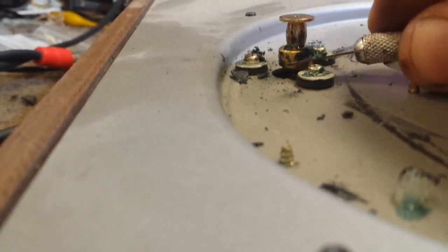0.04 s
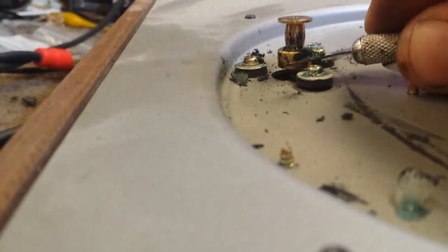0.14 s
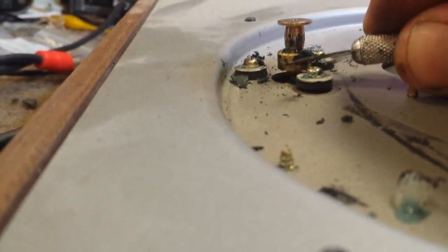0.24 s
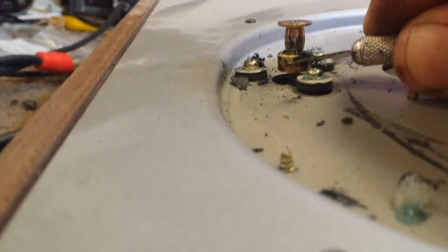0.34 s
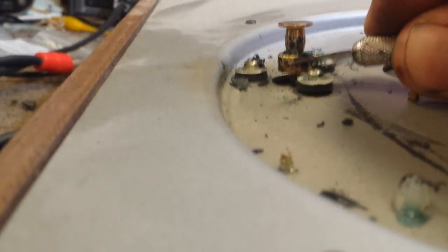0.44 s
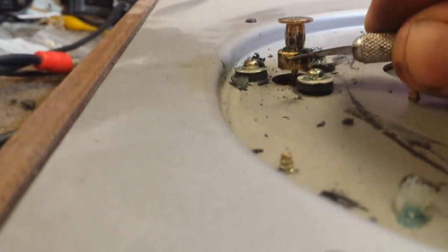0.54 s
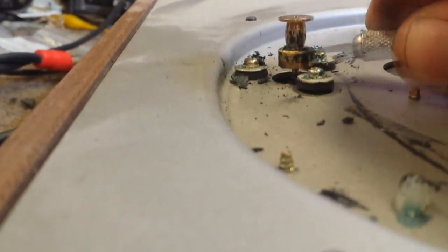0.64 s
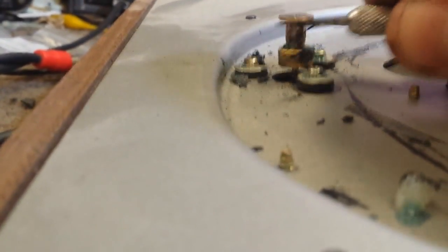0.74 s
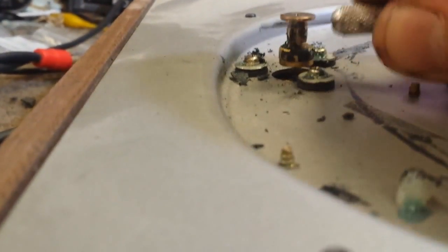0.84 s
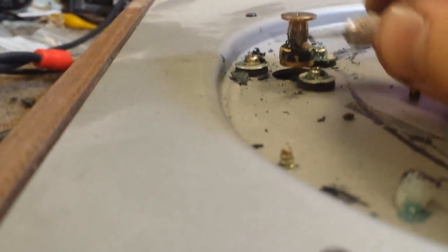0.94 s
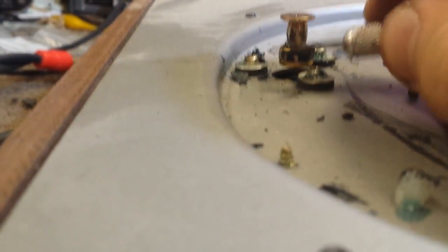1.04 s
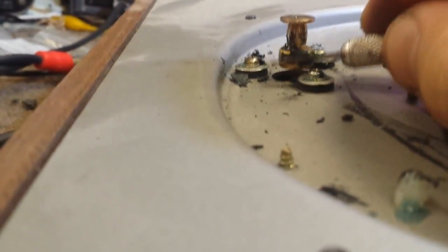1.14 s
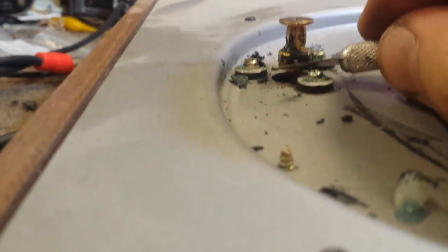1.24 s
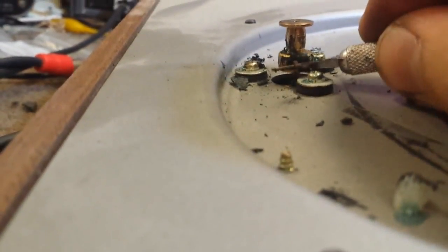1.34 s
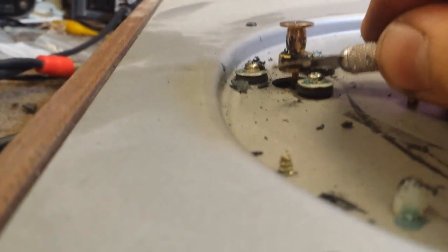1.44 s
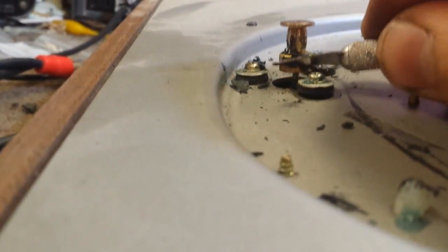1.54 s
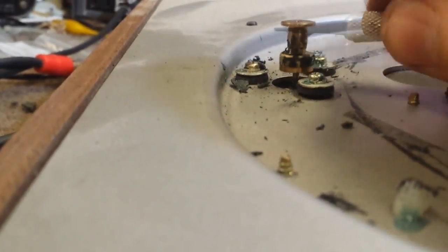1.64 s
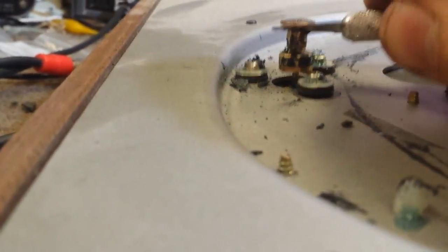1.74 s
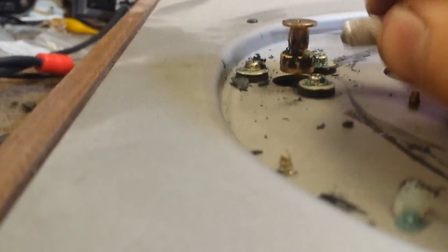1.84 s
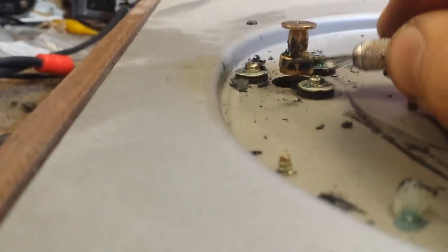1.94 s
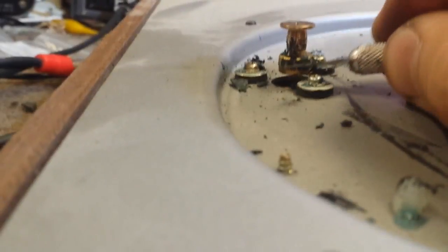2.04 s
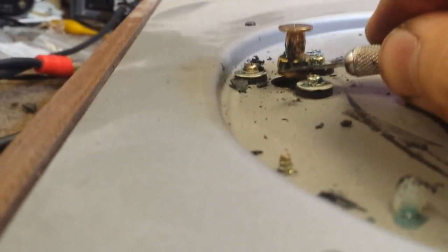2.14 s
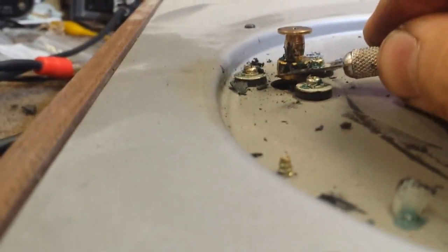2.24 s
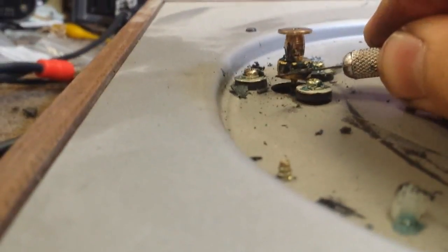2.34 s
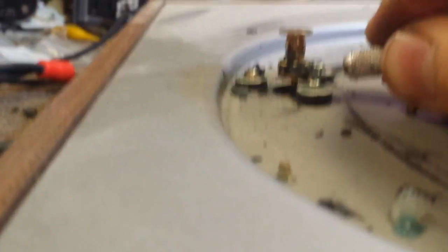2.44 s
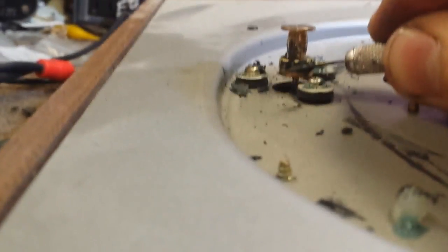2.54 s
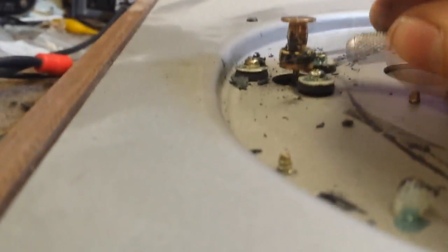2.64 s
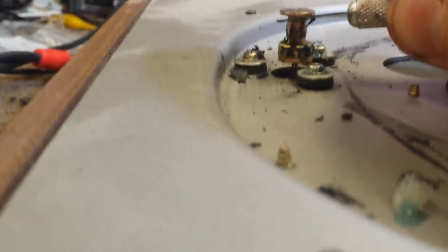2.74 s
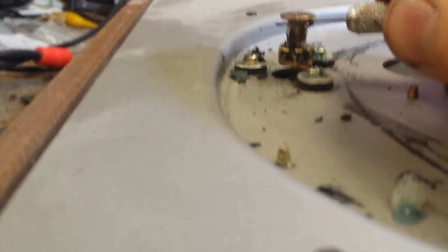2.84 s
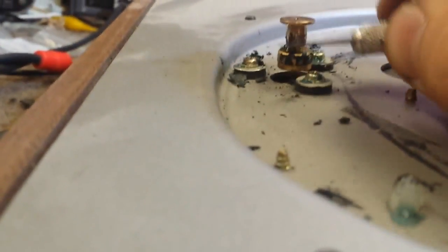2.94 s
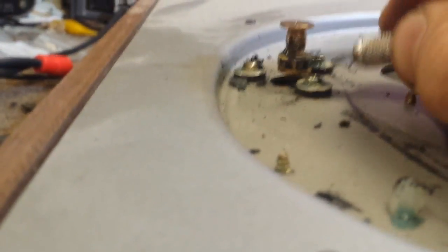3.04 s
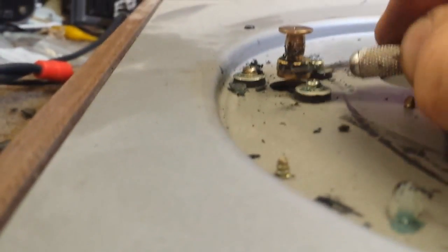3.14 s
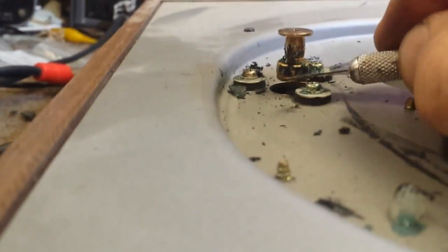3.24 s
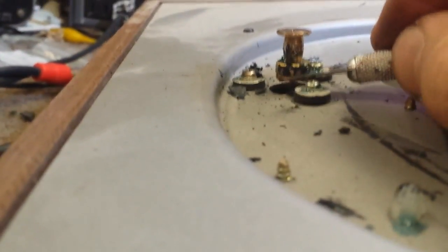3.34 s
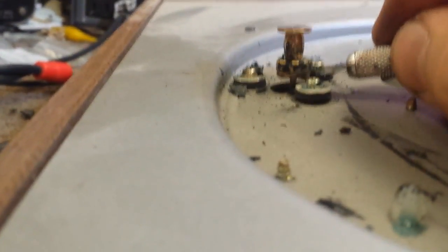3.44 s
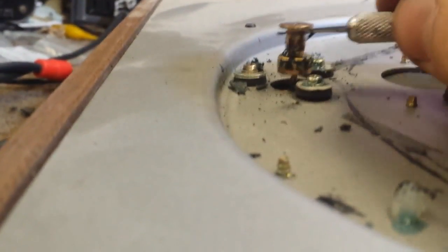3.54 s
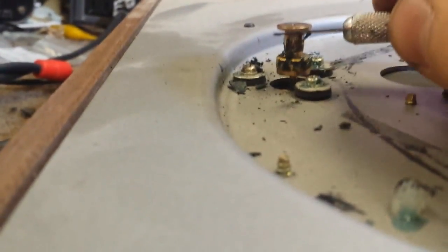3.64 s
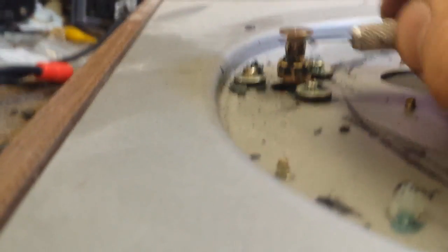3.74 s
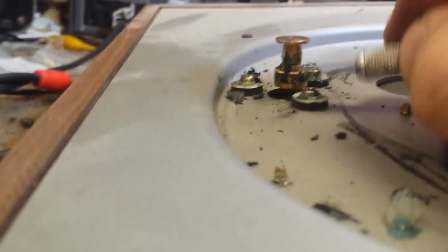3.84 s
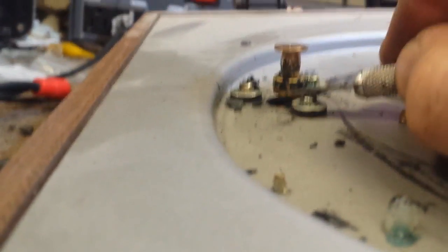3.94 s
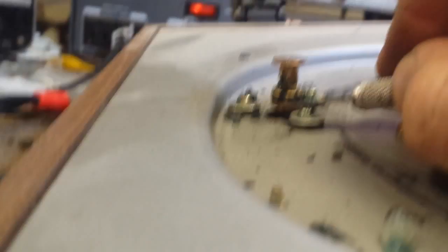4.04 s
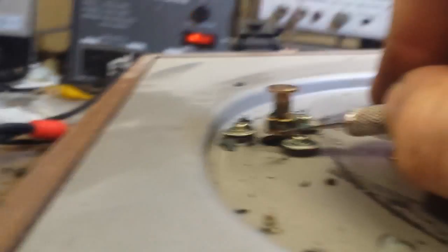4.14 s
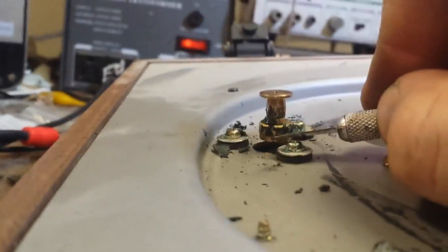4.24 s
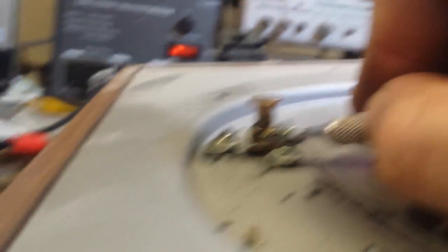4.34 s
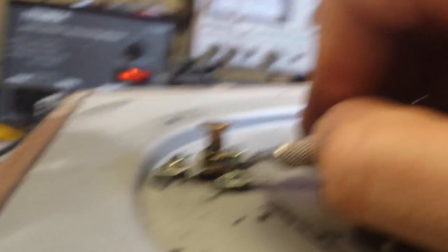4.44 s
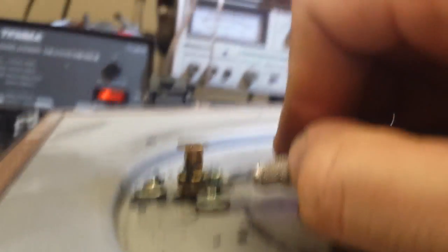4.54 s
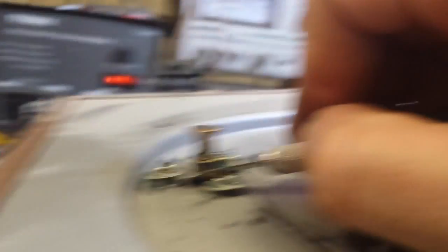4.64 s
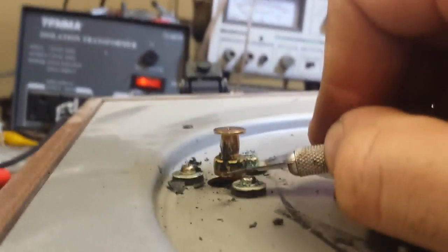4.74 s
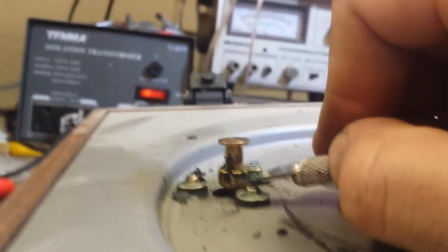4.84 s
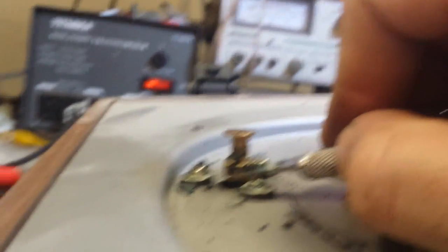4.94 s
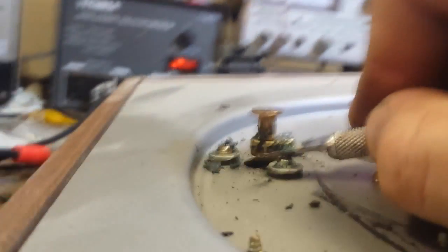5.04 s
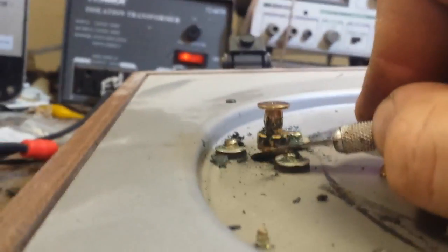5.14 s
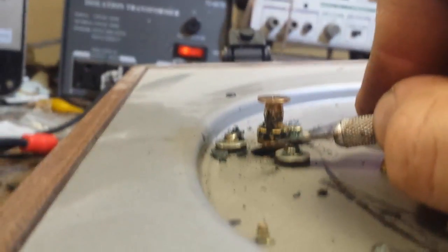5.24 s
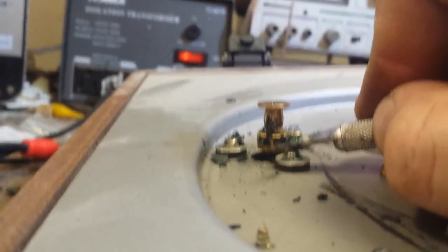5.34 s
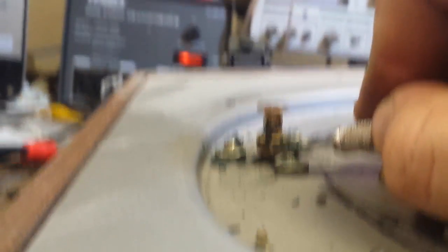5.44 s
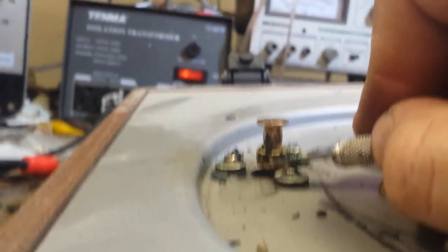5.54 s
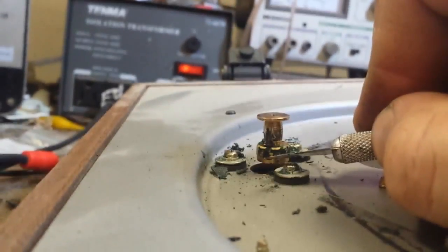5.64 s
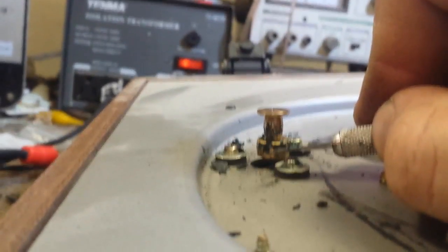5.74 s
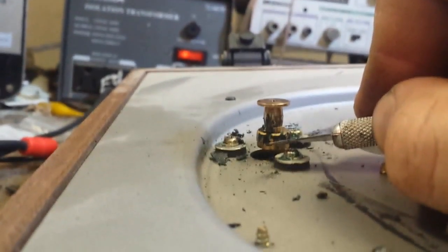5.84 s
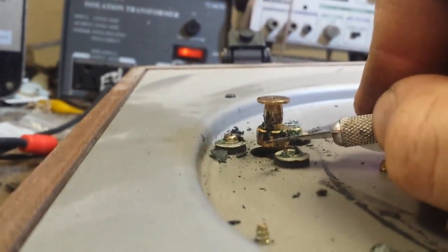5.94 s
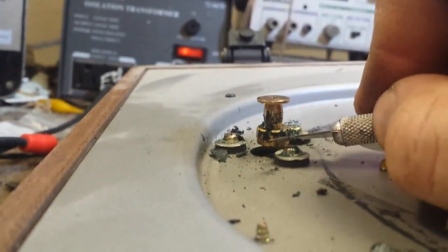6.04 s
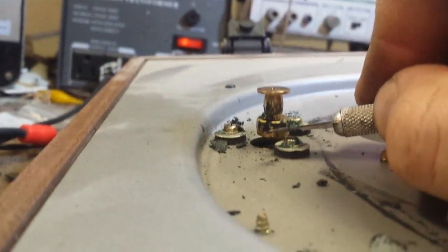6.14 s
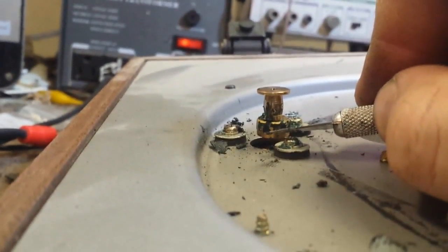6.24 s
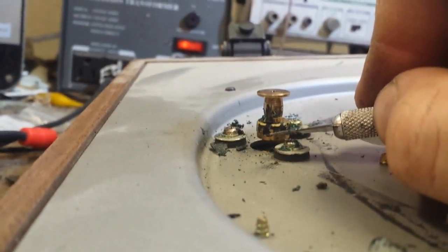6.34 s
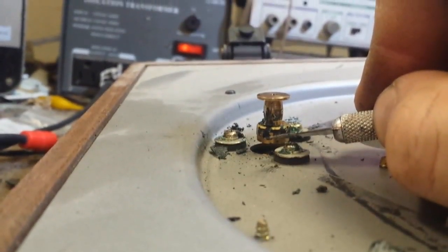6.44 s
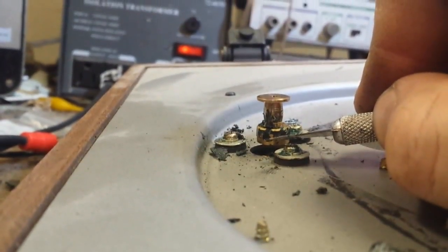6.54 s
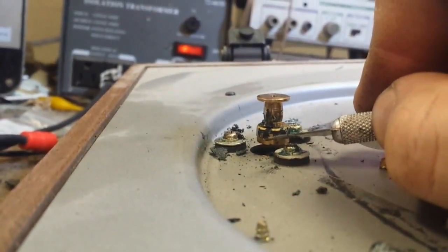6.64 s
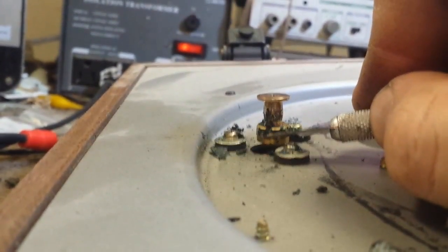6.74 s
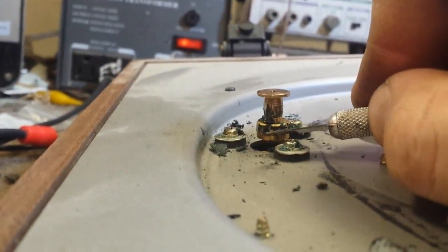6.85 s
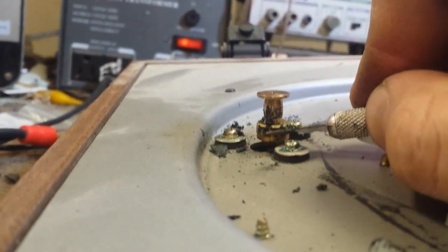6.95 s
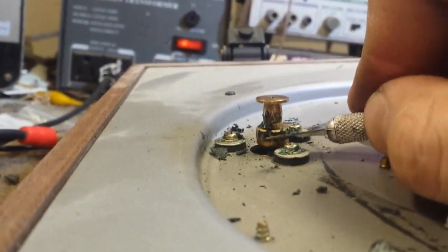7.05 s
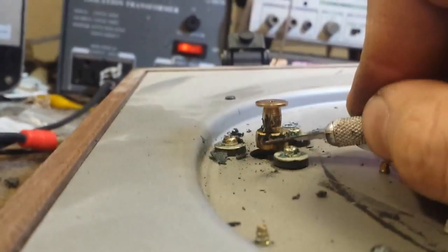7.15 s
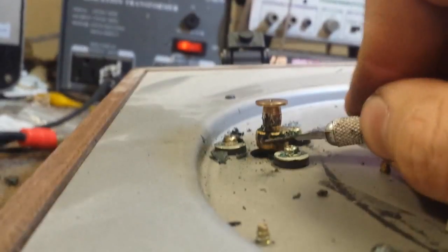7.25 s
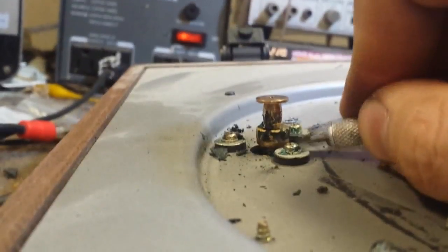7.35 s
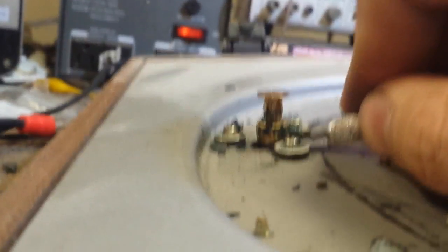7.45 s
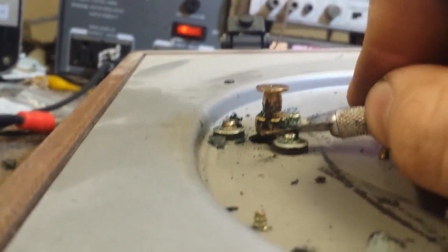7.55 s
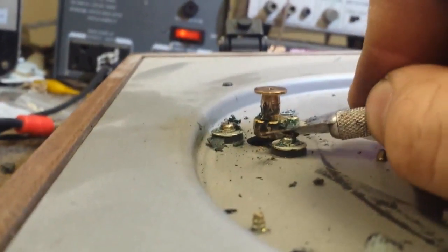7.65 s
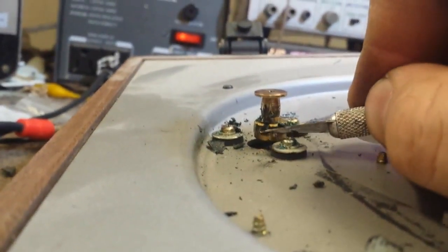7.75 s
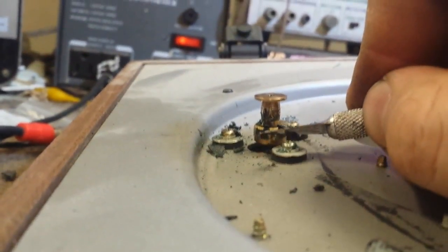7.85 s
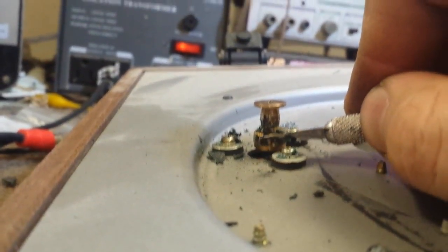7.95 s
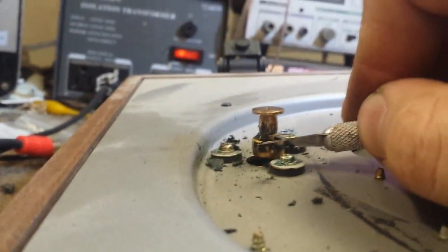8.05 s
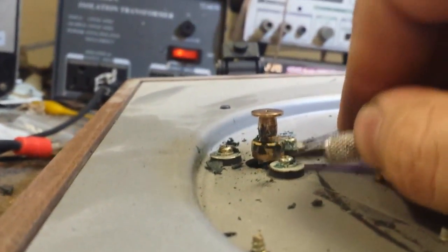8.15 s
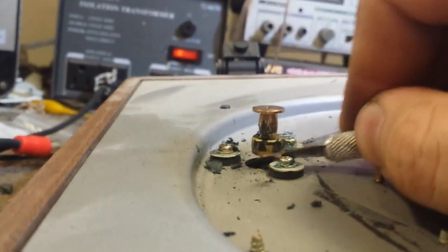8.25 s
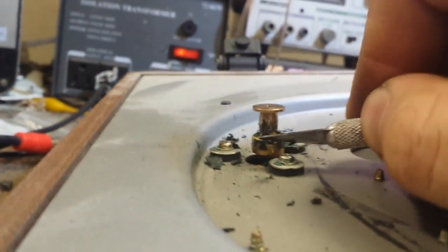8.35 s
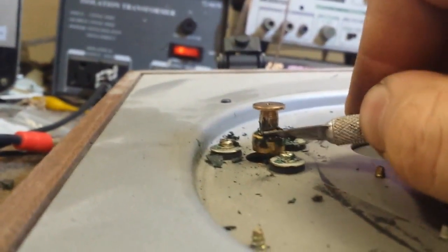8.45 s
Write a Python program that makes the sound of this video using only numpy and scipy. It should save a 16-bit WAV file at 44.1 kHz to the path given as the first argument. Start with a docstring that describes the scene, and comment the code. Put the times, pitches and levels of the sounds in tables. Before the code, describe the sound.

A quiet workshop, heard very close in stereo, with soft hiss, low mains hum and a thin high whine toward the right that shifts between two pitches. From 0 s a small blade rasps hard residue on a brass motor pulley in short gritty strokes, with a tick near 0.2 s. Sharp slips crack, ring and knock the loosely mounted motor at about 0.5, 0.65 and 0.95 s, a tight cluster at 1.6-1.75, then 2.3, a strong one at 2.65, and 3.5 s. Around 3.7-4.4 s a hand brushes the camera; soft thumps and shell ticks follow at 4.55, strongest at 4.65, then 5.05 and 5.4, with a small tap at 5.5. Mostly background remains until about 7 s. Scraping returns, with a rapid four-click judder and sharp hit at 7.3-7.35, crackling flakes, light touches, a double click near 8.1 and a final coarse scrape at 8.25-8.35 s.

```python
"""A hobby knife picks and scrapes hardened residue off the brass pulley of a turntable motor.
Each slip of the blade cracks the residue, rings the steel and knocks the motor, which shudders on its
rubber mounts; cracks, rings and shudders are noise and fracture trains sent through resonances.
A hand brushes and bumps the camera held close by: coloured friction noise, soft thumps and shell ticks.
Under it all lie mains hum (sines), hiss (coloured noise) and a thin electronic whine (narrow noise)."""
import sys
import numpy as np
from scipy import signal
from scipy.fft import rfft, irfft, next_fast_len
from scipy.io import wavfile
from scipy.ndimage import map_coordinates

SR = 44100
rng = np.random.default_rng(int(sys.argv[2]) if len(sys.argv) > 2 else 0)


def store_pcm(level_fs):
    """Save levels as 16-bit WAV."""
    pcm = np.round(np.clip(level_fs, -1, 1) * 32767).astype(np.int16)
    wavfile.write(sys.argv[1], SR, np.atleast_2d(pcm).T)


N = 374001
SPAN = 16384  # samples in one short sound, and the room left for a filter to ring out


def amp(db):
    """Decibels to gain."""
    return 10 ** (np.asarray(db) / 20)


def unit(x):
    """Scale to rms 1."""
    return x / np.sqrt(np.mean(x ** 2) + 1e-20)


def burst(x):
    """Scale each channel to the energy of 10 ms at rms 1."""
    energy = np.sum(x ** 2, axis=-1, keepdims=True)
    return x * np.sqrt(SR / 10 ** 2 / (energy + 1e-20))


def pan(left_db):
    """Left and right gains of mean power 1, with the left louder by left_db."""
    return unit(amp([[left_db / 2], [-left_db / 2]]))


def wobble(rate):
    """A smooth random curve through rate random points a second."""
    knots = rng.standard_normal(int(N * rate / SR) + 4)
    return map_coordinates(knots, [np.arange(N) * rate / SR])


def filtered(x, response):
    """Multiply the spectrum of x by a response of frequency."""
    n = x.shape[-1]
    padded = next_fast_len(n + SPAN)
    spectrum = rfft(x, padded) * response(np.fft.rfftfreq(padded, 1 / SR))
    return irfft(spectrum, padded)[..., :n]


def coloured(x, points):
    """Shape x by a smooth spectrum drawn through (frequency [Hz], level [dB]) points."""
    f, db = np.transpose(points)
    return filtered(x, lambda hz: amp(np.interp(np.log(hz + 1), np.log(f), db)))


def ringing(x, modes):
    """Send x through damped resonances: (frequency [Hz], width [Hz], level [dB])."""
    def response(f):
        total = 0
        for k, (centre, width, db) in enumerate(modes):
            resonance = 1j * f * width / (centre * centre - f * f + 1j * f * width)
            total = total + (-1) ** k * amp(db) * resonance  # neighbours have opposite signs
        return total
    return filtered(x, response)


def ports(size, alike):
    """Noise at the left and right microphones; alike is their correlation."""
    a, b = rng.standard_normal((2, size))
    turn = np.arccos(np.clip(alike, -1, 1)) / 2
    shared, opposed = np.cos(turn) * a, np.sin(turn) * b
    return np.array([shared + opposed, shared - opposed])


def lagged(x, seconds):
    """Make x reach the right microphone later than the left by this time."""
    sides = np.array([[1], [-1]])
    return filtered(x, lambda hz: np.exp(1j * np.pi * hz * seconds * sides))


def add(track, s, sound):
    """Mix a sound in at time s."""
    i = max(0, round(s * SR))
    track[:, i:i + SPAN] += sound[:, :max(0, N - i)]


def contact(seconds, alike, snap=0.97):
    """The force of one contact: a sharp break and a fading train of tiny fractures."""
    t = np.arange(SPAN) / SR
    uneven = amp(5 * rng.standard_normal(SPAN))
    fractures = burst(ports(SPAN, alike) * np.exp(-t / seconds) * uneven)
    # the longer the contact grinds, the less of its force goes into the sharp break
    first = burst(signal.unit_impulse(SPAN, round(SR * .0004)))
    return fractures + snap * np.exp(-seconds / 0.0036) * first


def bounce(hz, rise, fall, stiffer):
    """A few cycles of a soft mount: stiffer while compressed, so the pitch drops to hz as it relaxes."""
    t = np.arange(SPAN) / SR
    cycles = hz * t + stiffer * (1 - np.exp(-hz * t))
    return np.sin(2 * np.pi * cycles) * (1 - np.exp(-t / rise)) * np.exp(-t / fall)


def swell(start, length, shape, late=1):
    """One hand movement, from 0 up to 1 and back; late over 1 builds slowly and lets go quickly."""
    u = (np.arange(N) / SR - start) / length
    inside = (u > 0) & (u < 1)
    out = np.zeros(N)
    out[inside] = np.sin(np.pi * u[inside] ** late) ** shape
    return out


# spectrum of the room noise: (frequency [Hz], relative level [dB])
ROOM_SPECTRUM = [(20, -12), (55, -2.5), (90, 0.5), (250, -5), (400, -10.5), (800, -13), (1600, -17),
                 (3300, -17), (5500, -16.5), (9000, -20), (14500, -20.5)]


def room_hiss():
    """Steady noise, shaped to the dull spectrum of the room."""
    return amp(-67.0) * unit(coloured(ports(N, alike=0.22), ROOM_SPECTRUM))


# tones of the mains hum: (frequency [Hz], middle level [dB])
HUM_TONES = [(60, -72), (120, -85), (180, -83.5), (263, -84.5), (360, -85), (420, -94.5), (480, -85.5),
             (600, -85.5), (720, -88), (960, -94)]


def mains_hum():
    """Low sine tones whose levels each sway a little at random."""
    t = np.arange(N) / SR
    hum = 0
    for hz, db in HUM_TONES:
        level = amp(db + 2.1 * wobble(5.8)) * np.sqrt(2)
        hum = hum + level * np.sin(2 * np.pi * (hz * t + rng.random()))
    return hum


# spans in which the whine sits at its upper pitch: (start time [s], end time [s])
UPPER_WHINE_SPANS = [(-1, .63), (3.33, 6.4), (7.16, 8.46)]
# bands of the whine at its lower pitch: (frequency [Hz], width [Hz], relative level [dB])
LOW_WHINE_BANDS = [(4870, 120, -5), (5680, 120, 0), (6430, 130, -4), (7300, 200, -12)]
WHINE_SWITCH_S, WHINE_GLIDE_S = .03, .06  # crossfade time, time constant of the glide
WHINE_SAG_HZ = 485  # it glides up into the upper pitch and sags before leaving it


def electronic_whine():
    """Narrow bands of noise, mostly on the right, that change between two pitches."""
    t = np.arange(N) / SR
    depths = [np.minimum(t - start, end - t) for start, end in UPPER_WHINE_SPANS]
    inside_s = np.max(depths, axis=0).clip(0)  # time to the nearer end of the span, 0 outside
    upper = np.clip(inside_s / WHINE_SWITCH_S, 0, 1)
    sag_hz = WHINE_SAG_HZ * np.exp(-inside_s / WHINE_GLIDE_S)
    glide = np.exp(-2j * np.pi * np.cumsum(sag_hz) / SR)
    band = ringing(ports(N, alike=.2), [(5700, 1100, -17), (6507, 100, -1), (13936, 1600, -15.5)])
    # turning the phase of the analytic signal shifts the whole band down in pitch
    shifted = np.real(signal.hilbert(band, next_fast_len(N))[:, :N] * glide)
    high = amp(-65.5) * unit(shifted) * pan(-20.5)
    low = amp(-71.5) * unit(ringing(ports(N, alike=0.15), LOW_WHINE_BANDS)) * pan(-22.5)
    return upper * high + (1 - upper) * low


def background():
    """Room noise, mains hum and whine are independent and simply add up."""
    return room_hiss() + mains_hum() + electronic_whine()


# skin and cloth sliding by the camera: (start time [s], length [s], level [dB])
RUB_MOVES = [(3.687, .19, -55), (3.995, .07, -48.5), (4.04, .17, -37), (4.275, .092, -39), (4.32, .17, -54),
             (4.64, .063, -33), (4.755, 0.063, -53), (4.906, .1, -55.5), (5.093, 0.073, -46.5),
             (5.849, .3, -70.5)]
# colour of the rub at each microphone: (frequency [Hz], relative level [dB])
RUB_SPECTRUM_LEFT = [(40, -14), (160, 4), (350, 0), (1700, -3), (3300, 5), (4400, 4.5), (4900, 6),
                     (5400, 0), (9000, -1.5), (13500, -2.5)]
RUB_SPECTRUM_RIGHT = [(40, -18), (160, 9.5), (340, -4), (800, -2), (980, 1.5), (1170, 1), (1380, 3),
                      (2200, -12), (2900, -2.5), (3400, -10.5), (4900, -5), (5400, -2), (6400, 0.5),
                      (11000, -20.5)]
RUB_SHAPE = 1.74  # a rub swells and fades as a half sine to this power


def brushing():
    """Fine-grained friction on the camera body; each port colours it differently."""
    speed = sum(amp(db) * swell(start, length, RUB_SHAPE, late=1.25) for start, length, db in RUB_MOVES)
    drag = ports(N, alike=0.17) * amp(1.1 * wobble(400) + 0.6 * wobble(56))
    left = unit(coloured(drag[0], RUB_SPECTRUM_LEFT))
    right = unit(coloured(drag[1], RUB_SPECTRUM_RIGHT))
    rub = np.array([left, right]) * pan(-5)
    shell_modes = [(996, 130, -2.5), (1407, 53, 11.5), (1916, 140, -19), (3050, 160, -8.5)]
    shell = unit(ringing(drag, shell_modes)) * pan(-10)
    return speed * (rub + amp(-11.5) * shell)


# bumps on the camera: (time [s], thump level [dB], shell knock level [dB], shell tick level [dB],
# contact decay time [s], thump pitch [Hz], left-right difference of the knock [dB])
CAMERA_BUMPS = [(0.855, -52, -40, -48.5, .0003, 300, 23.5), (4.547, -33, -50, -68, .003, 116, -5.5),
                (4.653, -22, -37.5, -29, .015, 167, -9), (5.038, -28, -42.5, -40.5, 0.0074, 165.6, -13.5),
                (5.306, -60.5, -55.5, -67.5, 0.0012, 200, -19), (5.368, -34, -32, -33, 0.00215, 161, -20),
                (5.5004, -48.5, -48, -50, .0012, 122.5, -23), (8.079, -44, -78, -75, 0.0022, 131, -4)]
THUMP_DELAY_S = .0015  # the body of the camera follows the touch on its shell
RUSTLE_CONTACT_S = .015  # a bump that slides this long rustles as loudly as it ticks


def bumps():
    """A finger knocks the camera: a soft thump of a few cycles, a shell knock and tick, a brief tremble."""
    out, t = np.zeros((2, N)), np.arange(SPAN) / SR
    knock_modes = [(456, 410, 8), (865, 160, 11.4), (1195, 250, 14.7)]
    tick_modes = [(2500, 640, -9.5), (4740, 900, -2), (6030, 614, -1.0)]
    rustle_modes = [(7970, 1900, -2), (13300, 3000, -24)]
    for s, thump_db, knock_db, tick_db, seconds, hz, left_db in CAMERA_BUMPS:
        thump = amp(thump_db) * burst(bounce(hz, rise=0.0022, fall=0.0065, stiffer=0.11)) * pan(-10.5)
        knock = amp(knock_db) * burst(ringing(contact(seconds, alike=0.25), knock_modes)) * pan(left_db)
        tick = amp(tick_db) * burst(ringing(contact(seconds, alike=0.18), tick_modes)) * pan(left_db / 2)
        rustle_gain = amp(tick_db) * seconds / RUSTLE_CONTACT_S
        rustle = rustle_gain * burst(ringing(contact(seconds, alike=0.12), rustle_modes))
        fading = ports(SPAN, alike=0.27) * amp(-60 * t / 0.31)  # 60 dB down after 0.31 s
        tremble = amp(thump_db - 16) * burst(ringing(fading, [(209.7, 94, 0)]))
        add(out, s, knock + tick + rustle)
        add(out, s + THUMP_DELAY_S, thump + tremble)
    return lagged(out, seconds=-.00035)


# strokes of the edge over the residue:
# (start time [s], length [s], relative grit level [dB], relative motor grumble level [dB])
SCRAPE_STROKES = [(-.08, .22, -57, -54), (.125, .09, -49.5, -50), (0.176, .19, -56.5, -56.5),
                  (0.309, .12, -52.5, -56), (0.403, 0.25, -67, -55.5), (0.723, .31, -60.5, -60.5),
                  (0.801, 0.043, -66, -50.5), (1.244, 0.12, -56, -56.5), (1.334, .13, -60.5, -58.5),
                  (1.465, 0.12, -64, -66), (1.672, 0.264, -58, -63), (1.96, .13, -64.5, -64),
                  (2.102, 0.17, -59.5, -57.5), (2.34, 0.243, -58.5, -59.5), (2.54, .1, -62.5, -61.5),
                  (2.688, 0.16, -57, -59.5), (2.849, .14, -65, -69), (3.002, .09, -61.5, -56),
                  (3.39, .09, -63.5, -65.5), (6.981, .05, -63, -51), (7.196, 0.14, -60, -66),
                  (7.338, .26, -51, -56), (7.608, 0.097, -64, -63), (7.869, 0.21, -68.5, -64),
                  (8.1, 0.48, -63, -63), (8.246, 0.097, -47.5, -46.5)]
# spectrum of the grit: (frequency [Hz], relative level [dB])
GRIT_SPECTRUM = [(300, -25.5), (750, -2), (1300, -5), (1750, -0.5), (2150, -4), (2550, 4), (2900, -3),
                 (3300, -0.5), (3900, -1.5), (4900, -0.5), (6500, -5.5), (9000, -10.5), (14000, -17.5)]
# resonances of the pulley, also rung by each blow: (frequency [Hz], width [Hz], relative level [dB])
PULLEY_MODES = [(940, 400, -8), (1177, 84, -1.5), (1433, 19, -9), (1681, 58, 0), (1708, 39, -7.5),
                (2640, 130, -14.5)]
# the motor under a steady rub: (frequency [Hz], width [Hz], relative level [dB])
GRUMBLE_MODES = [(170, 220, -1.5), (313, 210, 0), (375.7, 82, 2), (523, 130, -7.5)]
STROKE_SHAPE = 1.2  # pressure rises and falls as a half sine to this power
CRUMBS_PER_S, CRUMB_DB = 110, -5  # coarser crumbs on each channel, level against the fine grains


def scraping():
    """The edge rasps over fine grains of residue, which also shake the motor."""
    grit, grumble = np.zeros((2, N))
    for start, length, grit_db, grumble_db in SCRAPE_STROKES:
        pressure = swell(start, length, STROKE_SHAPE)
        grit = grit + amp(grit_db) * pressure
        grumble = grumble + amp(grumble_db) * pressure
    crumbs = unit(ports(N, alike=0.3) * (rng.random(N) < CRUMBS_PER_S / SR))
    fine = unit(ports(N, alike=0.12) * amp(3 * rng.standard_normal(N)))
    grains = fine + amp(CRUMB_DB) * crumbs
    catch = unit(amp(1.4 * wobble(200) + 3.2 * wobble(40)))  # the edge catches unevenly
    caught = grains * catch
    rasp = unit(coloured(caught, GRIT_SPECTRUM)) + amp(-10.5) * unit(ringing(caught, PULLEY_MODES))
    shake = unit(ringing(ports(N, alike=0.67) * catch, GRUMBLE_MODES))
    return amp(-1.5) * grit * rasp * pan(7) + amp(-2.0) * grumble * shake * pan(1.5)


# resonances of the residue: (frequency [Hz], width [Hz], relative level [dB])
RESIDUE_MODES = [(7240, 640, -6.5), (7520, 210, -1.5), (8140, 460, 0.5), (9010, 320, 0.5), (9190, 200, 1),
                 (10460, 1100, -5), (11600, 250, -2), (12500, 1100, -5), (14400, 2100, -7)]


def crack(seconds):
    """Hard residue fractures, ringing at high frequencies."""
    return burst(ringing(contact(seconds, alike=0.15), RESIDUE_MODES)) * pan(-2.4)


# single flakes snapping off: (time [s], level [dB])
FLAKE_SNAPS = [(2.523, -53.5), (3.046, -49), (7.421, -54), (7.484, -51), (7.771, -53.5), (8.049, -57.5)]
FLAKE_S = .0011  # decay time of a breaking flake


def flakes():
    """Loose flakes crack off without moving the motor."""
    out = np.zeros((2, N))
    for s, db in FLAKE_SNAPS:
        add(out, s, amp(db) * crack(FLAKE_S))
    return out


# resonances of the motor on its mounts: (frequency [Hz], width [Hz], relative level [dB])
MOTOR_MODES = [(106, 120, -4.5), (191, 78, 3), (261, 45, 1), (335, 59, -2.5), (393, 67, -2), (476, 19, -7),
               (514, 22, -2.5), (604.1, 78, -7.5), (784, 30, -12)]
# resonances of the blade: (frequency [Hz], width [Hz], relative level [dB])
BLADE_MODES = [(3500, 360, -12), (3990, 180, -3.5), (4560, 140, 0), (4980, 640, -4), (5330, 120, -7),
               (6650, 1500, -9.5)]
# spectrum of the motor's loose parts: (frequency [Hz], relative level [dB])
RATTLE_SPECTRUM = [(100, -20), (400, 0.5), (800, 0), (1500, -1.5), (2400, -2), (4800, -0.5), (7000, 0),
                   (9500, -0.5), (14000, -2)]
CLACK_HZ = 1480  # pulley resonance of light contacts and of the judder


def blow(levels_db, seconds, thud_hz, clack_hz, ring_hz, left_db):
    """The blade meets the pulley once; the motor bounces and its loose parts rattle."""
    thud_db, clack_db, blade_db, crack_db = levels_db
    t = np.arange(SPAN) / SR
    thud = amp(thud_db - 5) * burst(bounce(thud_hz, rise=0.0016, fall=0.0057, stiffer=.4)) * pan(-2.3)
    thud = lagged(thud, seconds=-.0005)  # the deck carries it to the right side first
    # the point of contact picks out one resonance of pulley and blade, damped by the fingers
    pulley_modes = PULLEY_MODES + [(clack_hz, 420, 2)]
    blade_modes = BLADE_MODES + [(ring_hz, 900, 3)]
    clack = amp(clack_db - 2.0) * burst(ringing(contact(seconds, alike=0.58), pulley_modes)) * pan(1)
    ring = amp(blade_db - 4.5) * burst(ringing(contact(seconds, alike=0.1), blade_modes)) * pan(left_db)
    # the harder the motor is shoved, the more it shudders and rattles
    shudder = burst(ringing(contact(seconds + 0.0054, alike=0.42), MOTOR_MODES))
    settling = ports(SPAN, alike=0.36) * amp(-60 * t / 0.21)  # 60 dB down after 0.21 s
    settle = burst(ringing(settling, [(190, 40, 0), (265, 32, -0.97), (348, 50, -1.7)]))
    loose = coloured(ports(SPAN, alike=0.46), RATTLE_SPECTRUM)
    rattle = burst(loose * amp(-60 * t / 0.16) * (1 - np.exp(-t / 0.0047)))
    motor = thud + amp(thud_db - 4.0) * shudder + amp(thud_db - 11.0) * settle + amp(thud_db - 11.5) * rattle
    return motor + clack + ring + amp(crack_db - 3.0) * crack(seconds + 0.00016)


# the edge sets down on the residue without breaking it:
# (time [s], relative motor thud level [dB], relative steel level [dB])
LIGHT_TOUCHES = [(0.063, -57, -56), (0.167, -43, -39), (1.3837, -42, -46.5), (1.555, -75.5, -52),
                 (1.862, -47, -55), (2.01, -54, -53), (2.721, -48, -57), (3.046, -46, -52),
                 (3.669, -48, -43), (7.209, -59.5, -54), (7.286, -48, -48), (7.484, -50, -46),
                 (7.523, -48.5, -55), (7.665, -46.5, -52), (7.887, -56.5, -61.5), (8.1, -46.5, -46.5),
                 (8.144, -39, -38.5), (8.469, -45.5, -48)]
TOUCH_CLACK_DB, TOUCH_CRACK_DB = -4, -14  # against the steel
TOUCH_S, TOUCH_THUD_HZ, TOUCH_RING_HZ = .002, 300, 4150
TOUCH_LEFT_DB = 5.5  # the blade rings louder on the left


def touches():
    """Light contacts nudge the motor and tick the steel, with hardly any crack."""
    out = np.zeros((2, N))
    for s, thud_db, steel_db in LIGHT_TOUCHES:
        levels_db = (thud_db, steel_db + TOUCH_CLACK_DB, steel_db, steel_db + TOUCH_CRACK_DB)
        add(out, s, blow(levels_db, TOUCH_S, TOUCH_THUD_HZ, CLACK_HZ, TOUCH_RING_HZ, TOUCH_LEFT_DB))
    return out


# relative levels of each judder slip: (thud [dB], clack [dB], ring [dB], crack [dB])
JUDDER_LEVELS_DB = (-35.5, -31.5, -25, -27)
JUDDER_FIRST_DB = -6  # the first slip is weaker, before the edge has bitten
JUDDER_START_S, JUDDER_STEP_S, JUDDER_SCATTER_S = 7.302, .0105, .0007
JUDDER_CONTACT_S, JUDDER_THUD_HZ, JUDDER_RING_HZ = .003, 430, 5530
JUDDER_LEFT_DB = 10  # the blade rings louder on the left


def judder(count):
    """The blade sticks and slips across a ridge: a quick, slightly uneven run of like slips."""
    out = np.zeros((2, N))
    for k in range(count):
        s = JUDDER_START_S + k * JUDDER_STEP_S + JUDDER_SCATTER_S * rng.standard_normal()
        levels_db = np.add(JUDDER_LEVELS_DB, JUDDER_FIRST_DB * (k == 0))
        slip = blow(levels_db, JUDDER_CONTACT_S, JUDDER_THUD_HZ, CLACK_HZ, JUDDER_RING_HZ, JUDDER_LEFT_DB)
        add(out, s, slip)
    return out


# the blade breaks free and strikes the pulley: (time [s], then relative levels of motor thud [dB],
# pulley clack [dB], blade ring [dB] and residue crack [dB], contact decay time [s], thud pitch [Hz],
# clack pitch [Hz], ring pitch [Hz], left-right difference of the ring [dB],
# delay of the rebound [s] or 0 for none)
KNIFE_SLIPS = [(0.4628, -22, -42, -23, -16, 0.00033, 250, 855, 4460, 11, 0),
               (0.6352, -24, -23, -14, -18.5, 0.0023, 230, 1750, 6030, 6, .0077),
               (0.9507, -52.5, -44.5, -27.5, -28, 0.00086, 340, 1010, 5740, 2, 0.000069),
               (1.6222, -23.5, -29, -16, -18, 0.0013, 220, 1330, 4600, 11.5, .0056),
               (1.6416, -40, -45, -14.5, -38, 0.001, 232, 2300, 4010, 12, 0.00012),
               (1.743, -54.5, -39.5, -14.5, -49.5, 0.00084, 344, 2150, 4380, 12.5, 0.0012),
               (2.326, -33.5, -40.5, -28, -36, 0.00098, 170, 1090, 7400, 0, 0),
               (2.6375, -15.5, -20, -18.5, -16, 0.0033, 270, 1210, 5100, 2.5, .006),
               (2.854, -45, -42, -32, -43, .003, 139.7, 1705, 4230, 8, 0),
               (3.5119, -22.5, -22.5, -19.5, -16, 0.0038, 178, 1340, 5600, 4.5, .0065),
               (7.349, -31, -19, -17.5, -26, 0.0017, 330, 1460, 4130, 10.5, 0.0007),
               (8.119, -38, -26, -29, -31.5, 0.0049, 217, 1350, 4160, 6, 0)]
# the rebound against the first blow: (thud [dB], clack [dB], ring [dB], crack [dB])
REBOUND_LEVELS_DB = (-2, -13, -7, -5)
REBOUND_PITCH, REBOUND_LONGER = .72, 1.3  # its thud pitch and contact time, as ratios


def slips():
    """The blade breaks free; after most slips it lands a second time, softer and with a lower thud."""
    out = np.zeros((2, N))
    for s, *levels_db, seconds, thud_hz, clack_hz, ring_hz, left_db, rebound_s in KNIFE_SLIPS:
        add(out, s, blow(levels_db, seconds, thud_hz, clack_hz, ring_hz, left_db))
        if rebound_s > 0:
            softer_db = np.add(levels_db, REBOUND_LEVELS_DB)
            longer, lower_hz = seconds * REBOUND_LONGER, thud_hz * REBOUND_PITCH
            add(out, s + rebound_s, blow(softer_db, longer, lower_hz, clack_hz, ring_hz, left_db))
    return out


# the deck radiates little deep bass: (frequency [Hz], relative level [dB])
DECK_SPECTRUM = [(25, -10), (60, -3.5), (140, 0)]
# the left port hears the knife duller: (frequency [Hz], relative level [dB])
LEFT_PORT_SPECTRUM = [(8000, 0), (10000, -2), (14000, -9.5)]


def picks():
    """All the picking, as the two ports hear it from the deck."""
    knife = slips() + touches() + judder(count=4) + flakes()
    left, right = coloured(knife, DECK_SPECTRUM)
    return lagged(np.array([coloured(left, LEFT_PORT_SPECTRUM), right]), seconds=.00005)


def scene():
    """Knife work, handling and the quiet workshop."""
    return background() + brushing() + bumps() + scraping() + picks()


ROLL_HZ, TOP_HZ = 14700, 16600  # the treble starts to fall, and is gone


def record(dry):
    """The camera rounds off peaks at full scale and loses the top of the treble."""
    held = dry / (1 + np.abs(dry) ** 6) ** (1 / 6)

    def treble(hz):
        fall_db = np.interp(hz, [ROLL_HZ, ROLL_HZ + 300, TOP_HZ], [0, -22, -38])
        return amp(fall_db) * (hz < TOP_HZ)
    return filtered(held, treble)


dry = scene()
out = record(dry)
store_pcm(out)
```